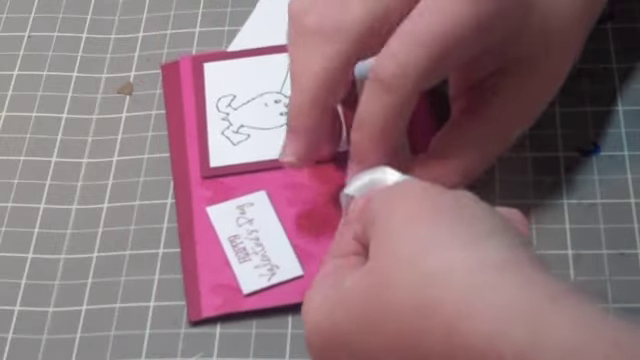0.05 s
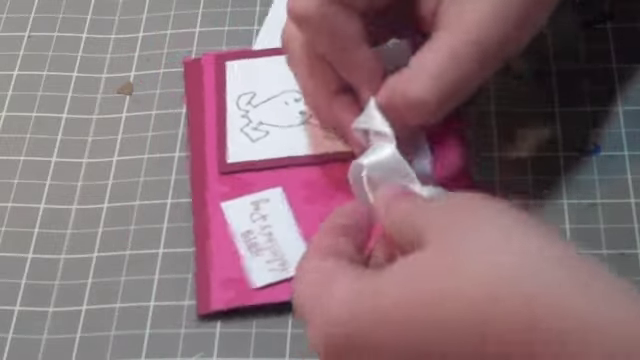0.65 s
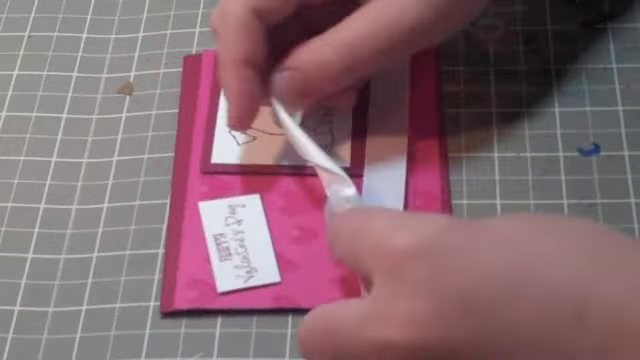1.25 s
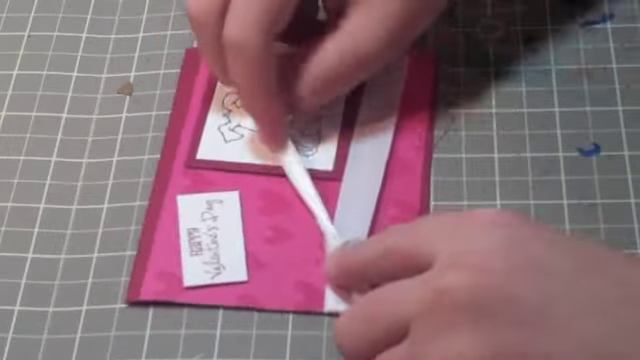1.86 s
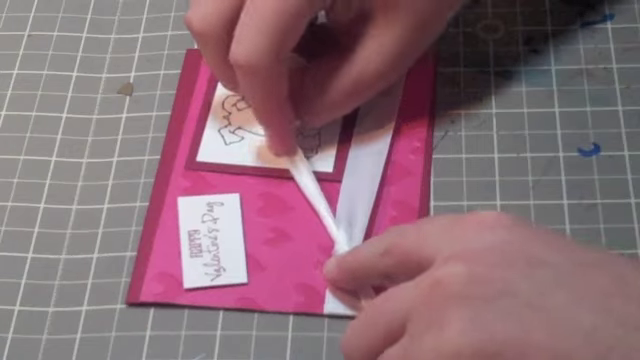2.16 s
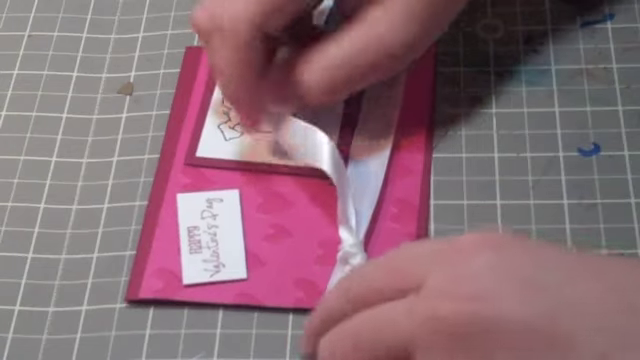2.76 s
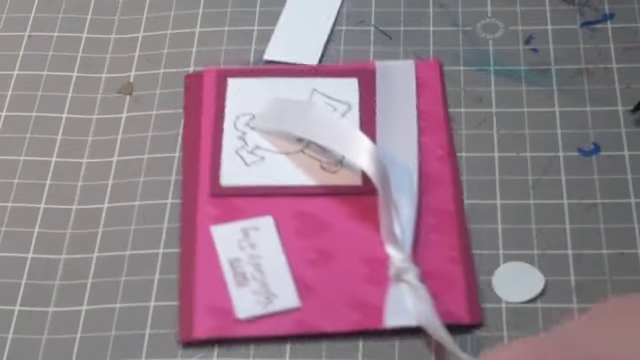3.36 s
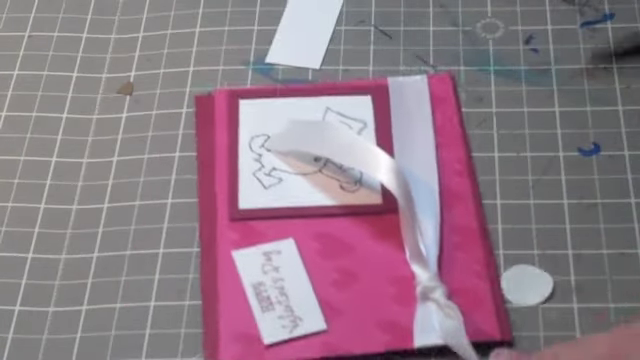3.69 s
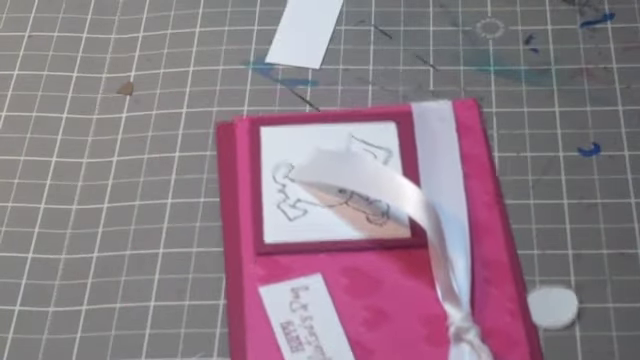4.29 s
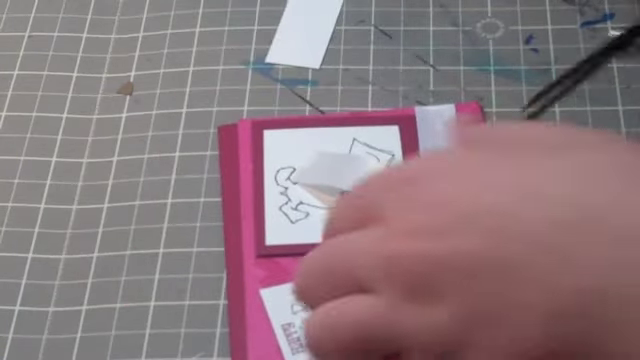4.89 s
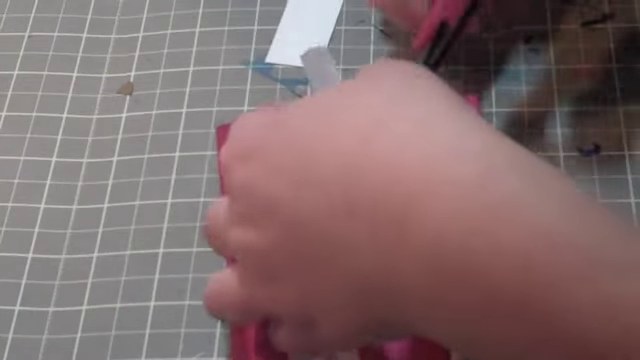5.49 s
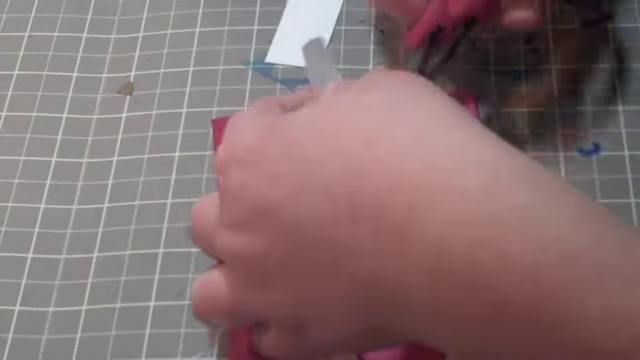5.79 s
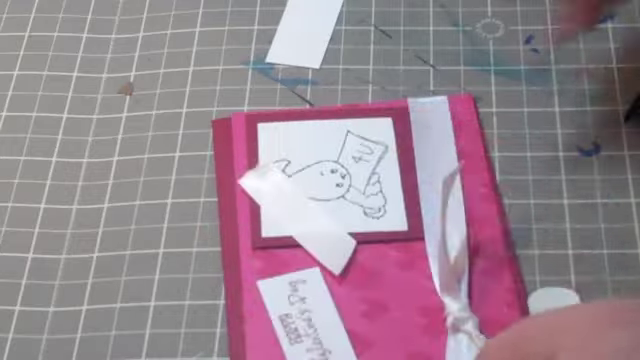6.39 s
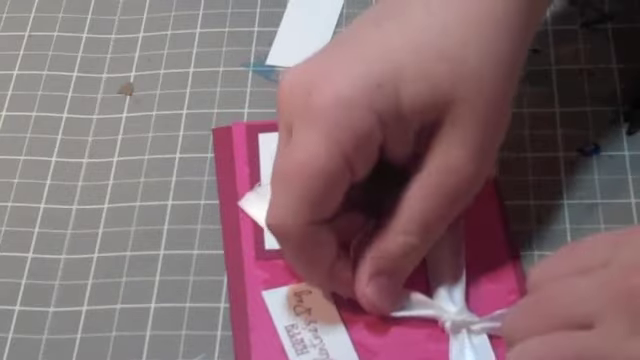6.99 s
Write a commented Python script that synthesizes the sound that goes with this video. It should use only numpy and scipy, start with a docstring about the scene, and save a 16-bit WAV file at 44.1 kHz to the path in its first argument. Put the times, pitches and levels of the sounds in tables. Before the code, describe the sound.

Satin ribbon rustles softly against a paper card, then scissors snip it twice and clatter onto a desk in a quiet room.

```python
"""Tying and trimming a ribbon

Satin is tied on a paper card on a desk in a quiet room. Slipping fibres make ribbon and fingers
rustle; the card scrapes over the mat and ticks. Scissors are picked up, shear the ribbon ends and
are dropped back: each knock rings desk, handles and steel. Room air and a faint hum lie below."""
import sys
import numpy as np
from scipy import signal
from scipy.fft import rfft, irfft, next_fast_len
from scipy.io import wavfile

SR = 44100
rng = np.random.default_rng(int(sys.argv[2]) if len(sys.argv) > 2 else 0)


def inscribe(sig):
    """Save sig as 16-bit PCM at rate SR to the path in sys.argv[1].

    A 1-D sig is mono; a 2-D sig holds one channel per row.
    Samples are clipped to [-1, 1] before scaling.
    """
    pcm = np.round(np.clip(np.atleast_2d(sig).T, -1, 1) * 32767)
    wavfile.write(sys.argv[1], SR, pcm.astype(np.int16))


N = 319725
TIME_S = np.arange(N) / SR
CUTOFF_HZ = 16000
ROOM_T60_S, ROOM_AIR_DB = 0.31, -63.5
CARD_PAN_DB, SCISSORS_PAN_DB, SCISSORS_LAG_S = 0.74, 0.88, 3.2e-5
PULL_SHAPE, SLIDE_SHAPE, SHEAR_SHAPE = 1.24, 1.48, 0.82  # flank exponent: 1 pointed, 2 bell
DESK_FOCUS_DB, HANDLE_FOCUS_DB, STEEL_FOCUS_DB = 3, 11, 2.5
DESK_FOCUS_OCT, HANDLE_FOCUS_OCT, STEEL_FOCUS_OCT = 0.3, 0.15, 0.49

# satin pulled through fingers: t/s, level/dB, rise/s, fall/s, rub over hiss/dB
RIBBON_PULLS = [(0.04, -75.5, 0.066, 0.074, 2), (0.3, -72, 0.12, 0.11, 0), (0.418, -56.5, 0.017, 0.019, -5),
                (0.53, -68, 0.24, 0.18, 0.5), (0.615, -57.5, 0.007, 0.016, 1.5),
                (0.648, -68, 0.027, 0.04, 6), (0.72, -72.5, 0.04, 0.032, 8),
                (0.951, -60.5, 0.04, 0.037, -11), (1.06, -63.5, 0.044, 0.075, -0.5),
                (1.22, -68, 0.086, 0.24, 1), (1.42, -65, 0.037, 0.13, 2.5), (1.81, -71, .14, 0.039, 3),
                (2.02, -75.5, 0.19, 0.2, 1), (2.17, -74, 0.013, 0.013, 1), (2.23, -79.5, 0.02, 0.045, 8),
                (2.59, -68.5, 0.038, 0.1, 0.5), (2.705, -66, 0.013, .012, -3),
                (2.76, -62.5, 0.02, 0.025, -4), (2.97, -73.5, 0.049, 0.035, 4),
                (3.15, -65, 0.047, 0.1, 3.5), (3.497, -63.5, .012, 0.0084, 0),
                (4.336, -59.5, .018, .01, -10), (4.415, -66.5, .04, 0.088, -23),
                (4.71, -73, 0.045, .05, 4.5), (5.08, -78, .02, 0.045, 6.5),
                (5.55, -76.5, 0.058, 0.025, 2.5), (5.768, -72, 0.018, .03, -15),
                (5.801, -58, .008, .008, -10), (6.58, -69, 0.073, 0.086, 4),
                (6.735, -68, 0.054, 0.019, 4.5), (6.8, -59.5, 0.041, 0.064, 2.5),
                (6.945, -64.5, 0.046, 0.03, 1), (7.2, -73.5, 0.11, 0.044, 5.5)]
# card, fingers, scissors sliding on the mat: t/s, level/dB, rise/s, fall/s, hiss over scrape/dB
MAT_SLIDES = [(2.802, -62, 0.011, 0.006, -10), (2.9, -66, 0.012, 0.018, -7), (3.41, -61, 0.041, 0.078, -1),
              (3.88, -65.5, 0.36, 0.35, -2.5), (3.97, -62, 0.022, 0.037, -10),
              (4.24, -68.5, 0.06, 0.032, 4), (4.512, -54.5, 0.054, 0.025, -7.5),
              (6.795, -60.5, 0.019, 0.0087, -2)]
# card, ribbon, fingernail and scissors ticks: t/s, level/dB, snap over dull part/dB
SMALL_TICKS = [(0.613, -68, 3), (0.7779, -63, 7.5), (2.086, -71.5, 4), (2.854, -64, -18), (4.298, -72, 11),
               (4.4422, -57.5, -20), (4.977, -58.5, -1), (6.144, -68.5, 10.5), (6.768, -58.5, 0.5),
               (6.797, -65.5, 4), (7.1366, -70.5, 10)]
# blades shearing or dragging: t/s, level/dB, rise/s, fall/s
BLADE_SHEARS = [(3.46, -57, 0.026, 0.036), (4.326, -52.5, 0.028, 0.018), (4.345, -51, 0.0055, 0.003),
                (4.991, -50.5, 0.011, 0.013), (5.77, -59.5, 0.012, 0.017), (5.795, -49, 0.0055, 0.007),
                (5.803, -45.5, 0.005, 0.0046)]
# one-band rubs: t/s, level/dB, rise/s, fall/s, f/Hz, width/Hz
FINGERTIP_RUBS = [(0.425, -65, 0.02, 0.027, 2000, 1400), (0.685, -69.5, 0.071, 0.08, 2070, 650),
                  (2.98, -71.5, 0.26, 0.28, 1560, 130), (6.86, -66, .07, .05, 5500, 1000),
                  (6.94, -63, .035, 0.033, 5900, 1000)]  # on card or satin
STEEL_SQUEAKS = [(3.5, -63, .005, .01, 5800, 200), (4.315, -63, .01, .008, 4100, 600),
                 (4.3445, -57, .0025, .002, 3800, 700), (4.42, -69, .02, .015, 8500, 400),
                 (5.777, -66, .014, .011, 7000, 350), (5.8062, -48, 0.0058, 0.0018, 3230, 400)]  # steel on steel
# scissors gripped or snapped shut: t/s, body/dB, loops/dB, blade/dB, clack f/Hz, snap f/Hz
HAND_CLACKS = [(4.179, -59, -57.5, -86, 1760, 4300), (4.3467, -64, -49, -39, 2240, 4300),
               (5.8079, -59.5, -47.5, -46.5, 1900, 5500), (6.054, -74, -52, -68.5, 1310, 4300),
               (6.112, -38, -39.5, -53, 2280, 5600), (6.133, -49, -47.5, -63, 2250, 4300)]
# scissors on the desk: t/s, level/dB; over that level: boom/dB, panel/dB, slap/dB, clack/dB, crack/dB;
# knock f/Hz, clack f/Hz, crack top f/Hz (low where the mat cushions)
DESK_KNOCKS = [(3.255, -49, -1, -12.5, -8.5, -20, -28, 400, 2200, 3500),
               (3.266, -47.5, -10, -12, -6, -6, -9.5, 490, 2270, 5000),
               (3.274, -49.5, -11, -15, -7, -9, -17, 390, 2250, 3800),
               (3.301, -49.5, -19, -16, -10, -22, -24, 520, 1950, 3500),
               (3.33, -49.5, -17, -10, -9, -9, -17, 460, 2270, 4000),
               (3.382, -51.5, -13, -13, -2.5, -7, -9, 600, 2250, 5500),
               (3.396, -50, -5, -7.5, -13, -22, -30, 340, 1850, 3500),
               (3.409, -51, -12, -9, -6, -8, -19, 370, 2150, 4200),
               (3.448, -43, -28, -20, -11, -15, -14.5, 350, 2200, 6000),
               (3.497, -46, -21, -14.5, -13, -20, -27, 390, 1850, 4000),
               (3.549, -42, -19, -14, -9.5, -12.5, -15, 475, 1980, 3960),
               (6.2443, -44.5, -16, -10, -5, -2, -2, 560, 2250, 7000),
               (6.2465, -29.5, -17, -19, -9.5, -7, -7.5, 580, 2050, 7800),
               (6.268, -26.5, -18.5, -17.5, -14.5, -11, -15, 490, 1830, 5900),
               (6.302, -32.5, -15, -6, -11, -8, -9.5, 460, 2150, 7900),
               (6.335, -49, -18, -14, -8, -7, -13, 380, 2080, 6000),
               (6.402, -59, -15, -5, -5, -4.5, -12, 520, 2000, 5500)]

# resonances: f/Hz, width/Hz, level/dB
CARD_MODES = [(1180, 500, -0.66), (1980, 1200, 0.16), (2260, 210, -2)]
PAPER_MODES = [(2870, 1200, 3), (4100, 1700, 22), (5500, 1200, 25), (8100, 1400, -2), (10300, 910, -17)]
HELD_BODY_MODES = [(187, 170, -2), (314, 51, 2), (500, 94, -8), (666, 88, 0), (900, 130, -6)]
HELD_LOOP_MODES = [(970, 280, 3.5), (1390, 230, -1.5), (1730, 430, 1), (2100, 240, 3.5), (2450, 240, -4)]
HELD_STEEL_MODES = [(3170, 400, -17), (4300, 400, 4.5), (5000, 560, 2), (5970, 910, -1), (7360, 1300, -2.5),
                    (9160, 450, -6), (9900, 650, -5), (13500, 3000, -28)]
HANDLE_MODES = [(1560, 260, -7), (1844, 100, 5.5), (2060, 140, 7), (2240, 90, 5), (2920, 500, 0)]
BLADE_MODES = [(2950, 230, -42), (3690, 970, -1.5), (4030, 180, 0), (4580, 500, -0.5), (5460, 1600, -7),
               (7400, 2500, -10.5), (10040, 1800, -2)]
DESK_FRAME_MODES = [(63.6, 8.5, -40), (87.8, 9.3, -3.5), (131, 470, -9)]
DESK_PANEL_MODES = [(173, 18, 1), (254, 34, -15.5)]
DESK_TOP_MODES = [(347, 28, 1.5), (392, 45, -1.5), (466, 50, 2), (510, 56, 3), (560, 40, 1),
                  (652, 70, -4.5), (906, 180, -0.5), (1105, 150, -1.5)]
DESK_SLAP_MODES = [(770, 90, 0), (930, 84, 3.5), (1020, 70, 2), (1140, 140, -2.5), (1490, 490, -6)]  # the desk top's higher modes

# noise spectra: f/Hz, relative level/dB
SATIN_HISS_SPECTRUM = [(3500, -5.5), (5500, -6.5), (7500, 3.5), (10200, 6.5), (11500, 3), (13000, -9),
                       (14500, -42)]
SATIN_RUB_SPECTRUM = [(400, -23), (1100, -18.5), (2000, -5), (3200, -5.5), (5300, -2.5), (7000, -9),
                      (10000, -32)]
MAT_SCRAPE_SPECTRUM = [(250, -25), (450, -10.5), (600, -4), (850, -1), (1200, -5.5), (1900, -3), (2700, -8),
                       (4000, -22), (8000, -41)]
MAT_HISS_SPECTRUM = [(2000, 2), (3600, 6), (5200, 5.5), (7000, -2.5), (9500, 1.5), (12000, -2.5),
                     (15000, -60)]
SHEAR_SPECTRUM = [(400, -12), (1100, -7), (2300, -1), (2650, -2), (3100, 2), (3900, 1.5), (5100, 0.5),
                  (5800, -0.5), (6600, -1.5), (7500, -4), (10500, -7), (12500, -14), (15000, -60)]
AIR_SPECTRUM = [(12, -14), (20, 4.5), (42, 3), (70, -0.5), (126, -4), (285, -7.5), (309, -9), (427, -9.5),
                (938, -13.5), (1050, -14), (1370, -17.5), (1570, -15.5), (2630, -20.5), (2850, -19),
                (11000, -31), (13000, -46), (16900, -100), (22000, -120)]
TAIL_SPECTRUM = [(80, 4), (135, -6.5), (240, -0.5), (350, -1.5), (520, -7.5), (1000, -4.5), (1600, -9),
                 (2300, -9), (5000, -13.5), (11000, -7.5), (15000, -15.5)]
# appliance hum and whine: f/Hz, level/dB
HUM_TONES = [(43, -89), (118.4, -73), (436, -78.5), (511, -82), (1357, -79), (1475, -80)]
# left-right likeness: f/Hz, correlation
DIFFUSE_CORRELATION = [(50, 0.93), (300, 0.83), (700, 0.64), (1500, 0.36), (3000, 0.24), (6000, 0.077),
                       (12000, 0.05)]
NEAR_CORRELATION = [(100, .98), (400, 0.98), (1000, 0.95), (2000, 0.66), (4000, 0.18), (10000, .05)]


def ribbon():
    """Satin hisses with each pull; a firmer grip adds a lower rub."""
    t_s, db, rise_s, fall_s, grip_db = np.transpose(RIBBON_PULLS)
    hiss = friction(SATIN_HISS_SPECTRUM, slips_per_s=2500, grain_db=-1.5, flutter_db=2.1, ring_s=0.00088)
    rub = friction(SATIN_RUB_SPECTRUM, slips_per_s=2000, grain_db=-4.5, flutter_db=1.8, ring_s=0.0023)
    hiss *= strokes(t_s, db, rise_s, fall_s, PULL_SHAPE)
    rub *= strokes(t_s, db + grip_db, rise_s, fall_s, PULL_SHAPE)
    return hiss + rub


def card():
    """Sliding on the mat scrapes and hisses; small contacts tick on the card."""
    t_s, db, rise_s, fall_s, hiss_db = np.transpose(MAT_SLIDES)
    scrape = friction(MAT_SCRAPE_SPECTRUM, slips_per_s=1500, grain_db=-2.5, flutter_db=0.5)
    hiss = friction(MAT_HISS_SPECTRUM, slips_per_s=1600, grain_db=-8.5, flutter_db=0.9)
    scrape *= strokes(t_s, db, rise_s, fall_s, SLIDE_SHAPE)
    hiss *= strokes(t_s, db + hiss_db, rise_s, fall_s, SLIDE_SHAPE)
    t_s, db, snap_db = np.transpose(SMALL_TICKS)
    dull = strike(t_s, db, CARD_MODES, scatter_db=0, scatter_s=0.002, band_hz=(800, 3500))
    snap = strike(t_s, db + snap_db, PAPER_MODES, scatter_db=1, scatter_s=0.0015, band_hz=(2300, 13000))
    return scrape + hiss + dull + snap


def cutting():
    """Blades crunch through threads, squeak and snap shut; the hand damps each clack."""
    shear = friction(SHEAR_SPECTRUM, slips_per_s=1500, grain_db=-6.5, flutter_db=3.5)
    shear *= strokes(*np.transpose(BLADE_SHEARS), SHEAR_SHAPE)
    t_s, body_db, loops_db, blade_db, clack_hz, snap_hz = np.transpose(HAND_CLACKS)
    loop_modes = focus_modes(HELD_LOOP_MODES, clack_hz, HANDLE_FOCUS_DB, HANDLE_FOCUS_OCT)
    steel_modes = focus_modes(HELD_STEEL_MODES, snap_hz, STEEL_FOCUS_DB, STEEL_FOCUS_OCT)
    body = strike(t_s, body_db, HELD_BODY_MODES, scatter_db=-0.5, scatter_s=0.011, band_hz=(128, 1080))
    loops = strike(t_s, loops_db, loop_modes, scatter_db=3, scatter_s=0.006, band_hz=(800, 2700))
    blade = strike(t_s, blade_db, steel_modes, scatter_db=-1, scatter_s=0.0042, band_hz=(2850, 15000))
    return shear + band_rubs(STEEL_SQUEAKS) + body + loops + blade


def knocks():
    """Scissors hit the desk: top knocks and slaps, frame and panel boom, handles clack, steel cracks."""
    (t_s, db, boom_db, panel_db, slap_db, clack_db, crack_db,
     knock_hz, clack_hz, crack_top_hz) = np.transpose(DESK_KNOCKS)
    top_modes = focus_modes(DESK_TOP_MODES, knock_hz, DESK_FOCUS_DB, DESK_FOCUS_OCT)
    handle_modes = focus_modes(HANDLE_MODES, clack_hz, HANDLE_FOCUS_DB, HANDLE_FOCUS_OCT)
    boom = strike(t_s, db + boom_db, DESK_FRAME_MODES,
                  scatter_db=-17, scatter_s=0.008, band_hz=(40, 130))
    panel = strike(t_s, db + panel_db, DESK_PANEL_MODES,
                   scatter_db=-17, scatter_s=0.008, band_hz=(145, 290))
    top = strike(t_s, db, top_modes, scatter_db=-8, scatter_s=0.008, band_hz=(289, 722))
    slap = strike(t_s, db + slap_db, DESK_SLAP_MODES,
                  scatter_db=0, scatter_s=0.0072, band_hz=(700, 1660))
    clack = strike(t_s, db + clack_db, handle_modes,
                   scatter_db=7, scatter_s=0.0093, band_hz=(1290, 2630))
    crack = strike(t_s, db + crack_db, BLADE_MODES,
                   scatter_db=0, scatter_s=0.011, band_hz=(2680, crack_top_hz))
    return boom - panel + top + slap + clack + crack


def band_rubs(rows):
    """Each rub drives one resonance as it swells and fades."""
    out = 0
    for t_s, db, rise_s, fall_s, hz, width_hz in rows:
        noise = at_microphones(rng.standard_normal((2, N)))
        rub = unit_rms(resonate(noise, [(hz, width_hz, 0)]))
        out = out + strokes([t_s], [db], [rise_s], [fall_s], SLIDE_SHAPE) * rub
    return out


def friction(spectrum, slips_per_s, grain_db, flutter_db, ring_s=0.0046):
    """Slipping fibres over diffuse hiss, under wavering pressure."""
    mid_side = rng.standard_normal((2, N))
    mid_side[0] += from_db(grain_db) * unit_rms(slips(slips_per_s, ring_s))
    return at_microphones(mid_side, spectrum) * from_db(flutter_db * drift(70))


def slips(per_s, ring_s):
    """Fibres catch and release at random, each ringing briefly at its own pitch."""
    starts = np.flatnonzero(rng.random(N) < per_s / SR)
    pitch, size, phase = rng.random((len(starts), 3)).T[:, :, None]
    age_s = TIME_S[:SR // 200]
    heights = (1 - 0.98 * size) ** -0.4  # many small, few large
    rings = heights * np.exp(-age_s / ring_s) * np.sin(2 * np.pi * (pitch * CUTOFF_HZ * age_s + phase))
    indices = starts[:, None] + np.arange(len(age_s))
    return np.bincount(indices.ravel(), rings.ravel(), N)[:N]


def strokes(peaks_s, levels_db, rises_s, falls_s, shape):
    """Gain curve of strokes that swell to a peak and fade, summed in power."""
    power = 0
    for t_s, db, rise_s, fall_s in zip(peaks_s, levels_db, rises_s, falls_s):
        from_peak = np.clip(np.maximum((t_s - TIME_S) / rise_s, (TIME_S - t_s) / fall_s), 0, 10)
        power = power + (from_db(db) * np.exp(-from_peak ** shape)) ** 2
    return np.sqrt(power)


def strike(times_s, levels_db, modes, scatter_db, scatter_s, band_hz):
    """A click plus scatter off nearby surfaces rings a body; modes are shared or per contact."""
    size, attack = SR // 3, SR // 100
    out = np.zeros((2, N + size))
    decay = np.exp(-TIME_S[:size] / scatter_s) + 1e-9
    low_hz, high_hz = band_hz
    tops_hz = np.clip(np.broadcast_to(high_hz, len(times_s)), low_hz + 20, 0.45 * SR)
    bodies = [modes] * len(times_s) if np.ndim(modes) == 2 else modes
    for t_s, db, body, top_hz in zip(times_s, levels_db, bodies, tops_hz):
        scatter = at_microphones(rng.standard_normal((2, size)), correlation=NEAR_CORRELATION) * decay
        contact = from_db(scatter_db) * unit_rms(scatter) / np.sqrt(size)
        contact[:, 0] += 1  # click
        bandpass = signal.butter(2, [low_hz, top_hz], "band", fs=SR, output="sos")
        ring = signal.sosfilt(bandpass, resonate(contact, body))
        attack_rms = np.sqrt(np.mean(ring[:, :attack] ** 2))
        start = round(t_s * SR)
        out[:, start:start + size] += from_db(db) * ring / attack_rms
    return out[:, :N]


def focus_modes(modes, centres_hz, lift_db, span_oct):
    """The contact point drives modes near one pitch harder; one mode set per contact."""
    return [[(hz, width_hz, db + lift_db * np.exp(-(np.log2(hz / centre_hz) / span_oct) ** 2))
             for hz, width_hz, db in modes]
            for centre_hz in centres_hz]


def resonate(x, modes):
    """Parallel two-pole resonances."""
    out = 0
    for hz, width_hz, db in modes:
        r = np.exp(-np.pi * width_hz / SR)
        poles = [1, -2 * r * np.cos(2 * np.pi * hz / SR), r * r]
        out = out + from_db(db) * signal.lfilter([(1 - r * r) / 2, 0, (r * r - 1) / 2], poles, x)
    return out


def at_microphones(mid_side, spectrum=((20, 0), (20000, 0)), correlation=DIFFUSE_CORRELATION):
    """Colour two unrelated signals and mix to left and right: alike in the bass, apart in the treble."""
    length = mid_side.shape[1]
    size = next_fast_len(length)
    hz = np.arange(size // 2 + 1) * SR / size
    mid, side = rfft(mid_side, size) * from_db(at_hz(spectrum, hz))
    alike = np.clip(at_hz(correlation, hz), -1, 1)
    left_right = np.sqrt(1 + alike) * mid + np.sqrt(1 - alike) * side * [[1], [-1]]
    return unit_rms(irfft(left_right, size)[:, :length])


def delayed(x, lag_s):
    """Fractional-sample delay."""
    size = next_fast_len(N + SR // 100)
    hz = np.arange(size // 2 + 1) * SR / size
    return irfft(rfft(x, size) * np.exp(-2j * np.pi * hz * lag_s), size)[:N]


def drift(knots_per_s):
    """Random wander between unit-variance knots."""
    knots = rng.standard_normal(N // 8)
    return np.interp(TIME_S * knots_per_s, np.arange(len(knots)), knots)


def at_hz(points, hz):
    """Read a table on a log-frequency axis."""
    known_hz, values = np.transpose(points)
    return np.interp(np.log(hz + 1), np.log(known_hz), values)


def from_db(db):
    """Decibels to gain."""
    return 10 ** (np.asarray(db) / 20)


def unit_rms(x):
    """Scale to rms 1."""
    return x / np.sqrt(np.mean(x ** 2) + 1e-20)


def pan_left(db):
    """Stereo gains: left up, right down."""
    return from_db([[db], [-db]])


def room(x, wet_db):
    """Small furnished room: adds a short diffuse tail, weak in the treble."""
    age_s = TIME_S[:SR // 2]
    noise = at_microphones(rng.standard_normal((2, len(age_s))), TAIL_SPECTRUM, NEAR_CORRELATION)
    onset = np.clip(age_s / 0.0042 - 0.5, 0, 1)
    decay = from_db(-60 * age_s / ROOM_T60_S)
    tail = unit_rms(noise * decay * onset) / np.sqrt(len(age_s))
    return x + from_db(wet_db) * signal.fftconvolve(x, tail, axes=1)[:, :N]


def background():
    """Steady room air and slightly unsteady appliance tones."""
    air = from_db(ROOM_AIR_DB) * at_microphones(rng.standard_normal((2, N)), AIR_SPECTRUM)
    hum = 0
    for hz, db in HUM_TONES:
        gain = from_db(db + 0.5 * drift(3.3))
        hum = hum + gain * np.sin(2 * np.pi * hz * TIME_S + 0.92 * drift(8))
    return air + hum


def scene():
    """Card ahead; scissors to the right, so their left channel lags. All slightly louder on the left."""
    tying = room(ribbon() + card() + band_rubs(FINGERTIP_RUBS), wet_db=-19) * pan_left(CARD_PAN_DB)
    left, right = room(cutting() + knocks(), wet_db=-15)
    scissors = np.array([delayed(left, SCISSORS_LAG_S), right]) * pan_left(SCISSORS_PAN_DB)
    return tying + scissors + background() * pan_left(db=0.6)


def record(dry):
    """Deep bass and top octave roll off; steep low-pass at 16 kHz."""
    heard = signal.sosfilt(signal.butter(2, 36, "high", fs=SR, output="sos"), dry)
    heard = signal.sosfilt(signal.butter(3, 12500, fs=SR, output="sos"), heard)
    return signal.sosfilt(signal.ellip(10, 0.1, 70, CUTOFF_HZ, fs=SR, output="sos"), heard)


dry = scene()
out = record(dry)
inscribe(out)
```